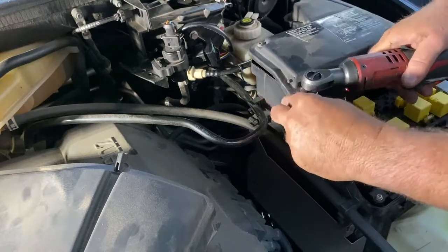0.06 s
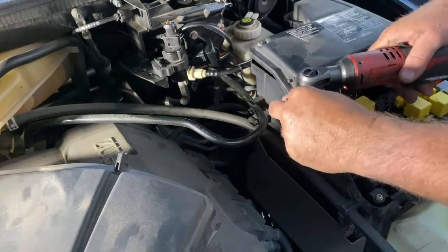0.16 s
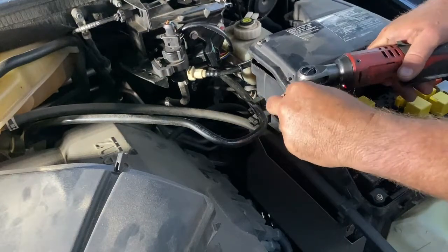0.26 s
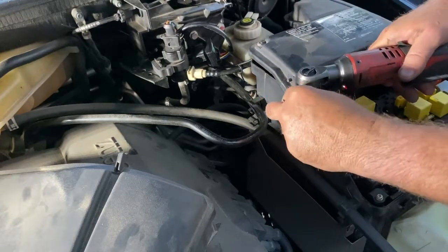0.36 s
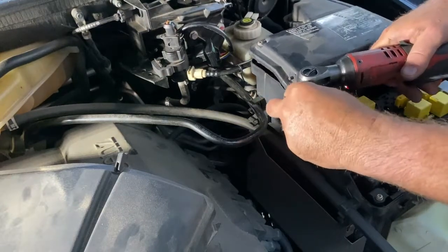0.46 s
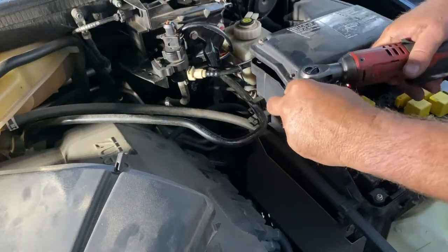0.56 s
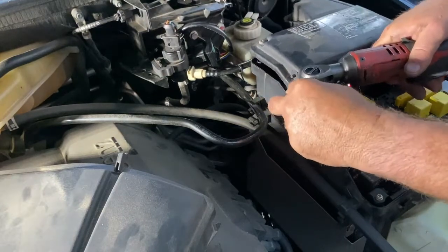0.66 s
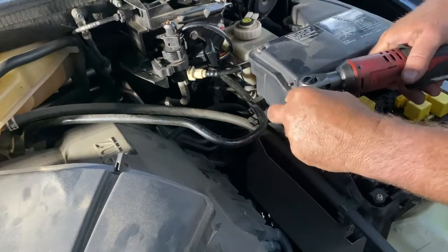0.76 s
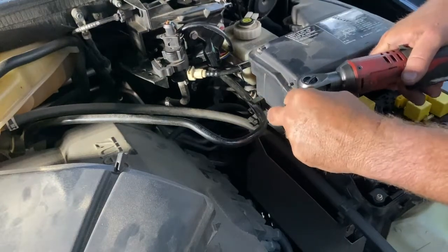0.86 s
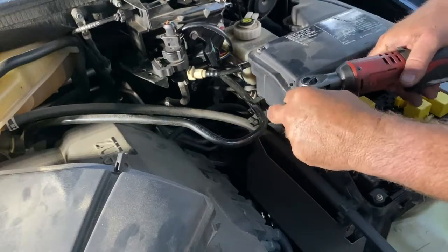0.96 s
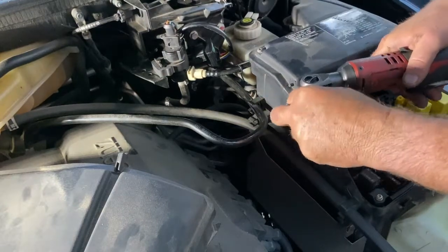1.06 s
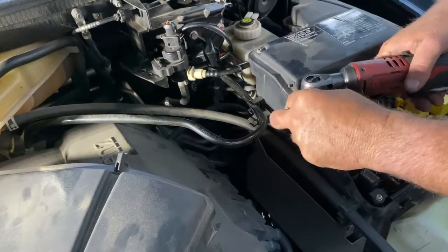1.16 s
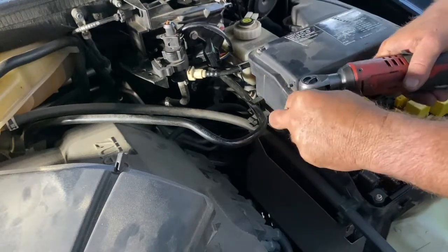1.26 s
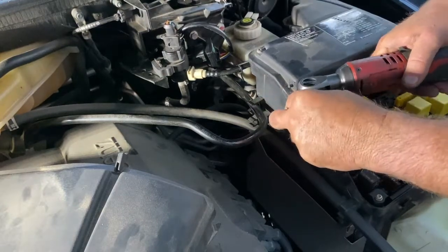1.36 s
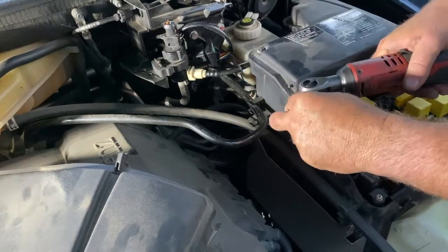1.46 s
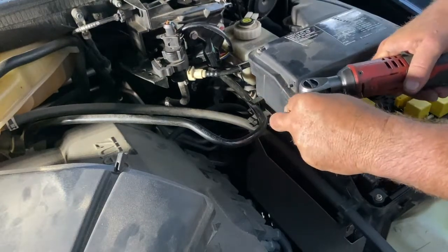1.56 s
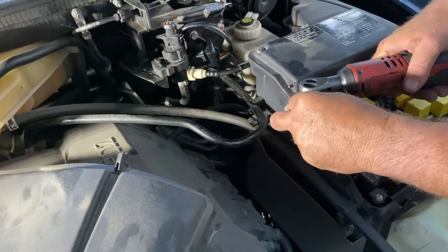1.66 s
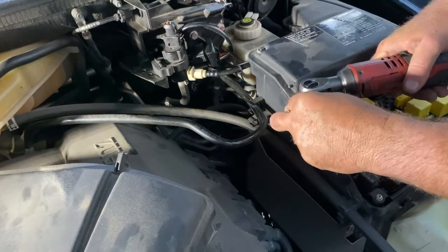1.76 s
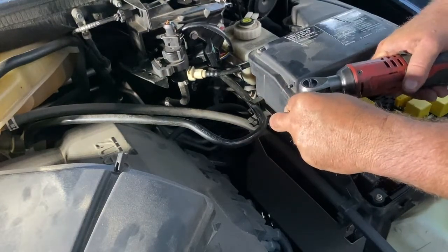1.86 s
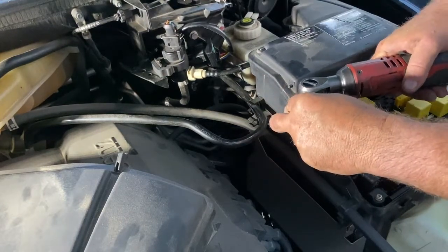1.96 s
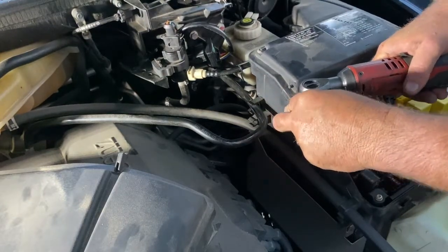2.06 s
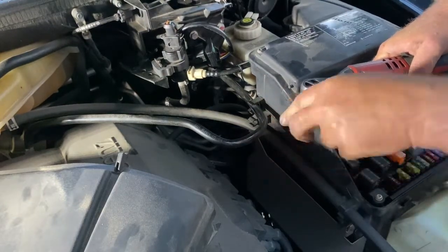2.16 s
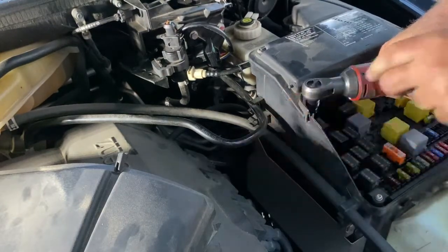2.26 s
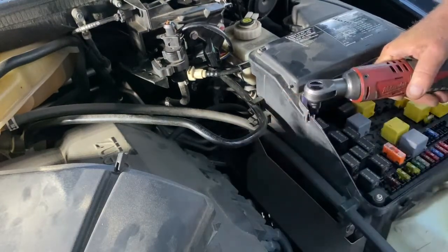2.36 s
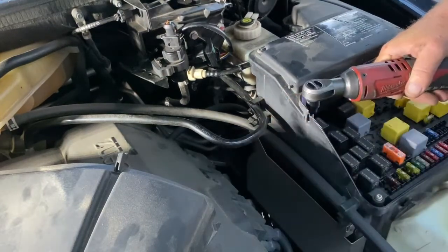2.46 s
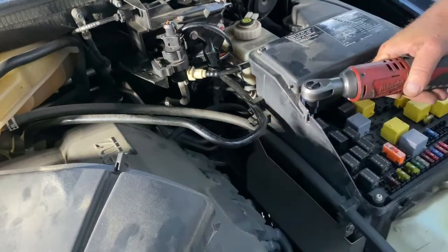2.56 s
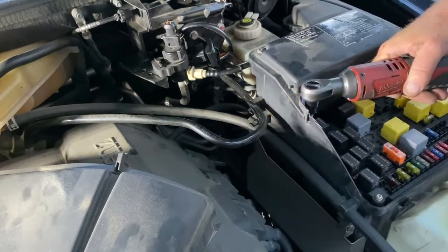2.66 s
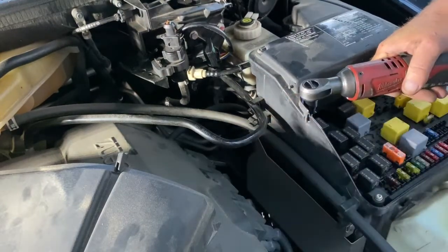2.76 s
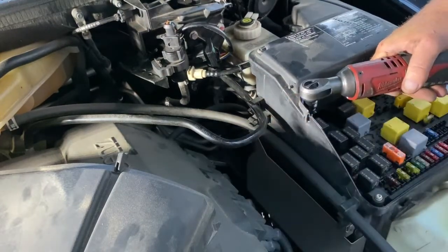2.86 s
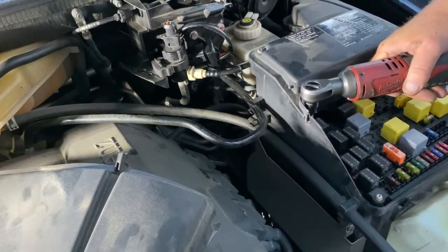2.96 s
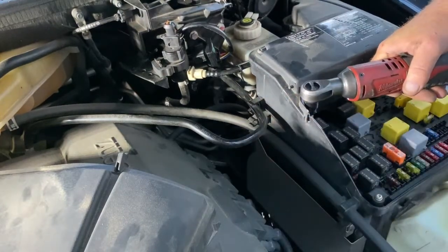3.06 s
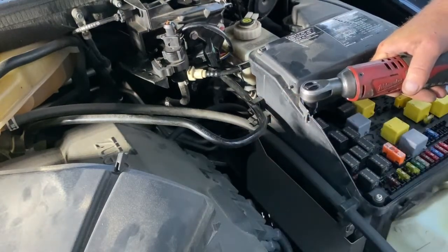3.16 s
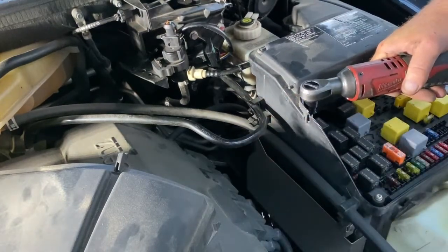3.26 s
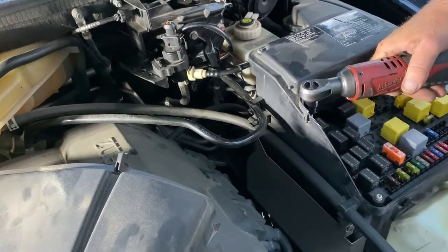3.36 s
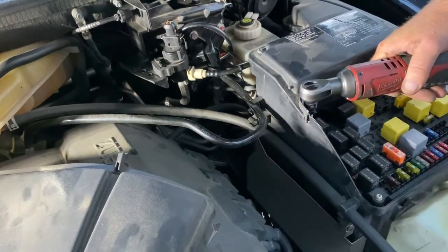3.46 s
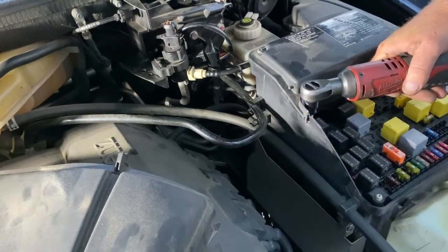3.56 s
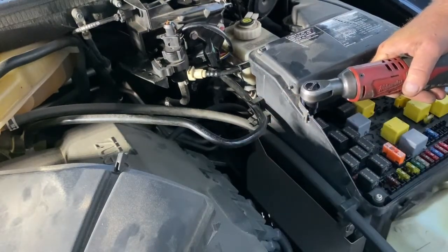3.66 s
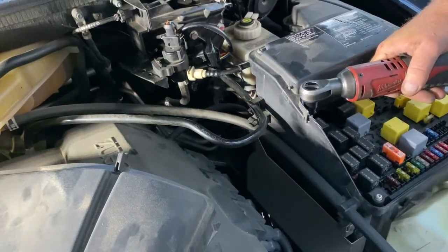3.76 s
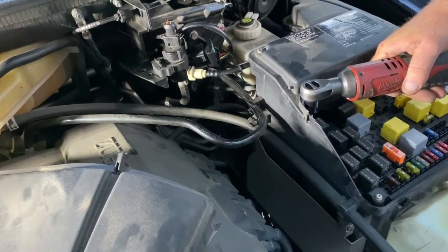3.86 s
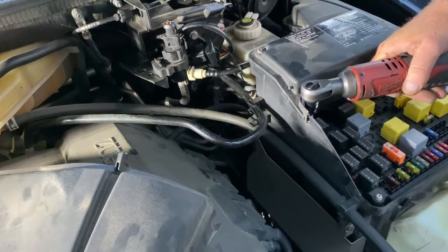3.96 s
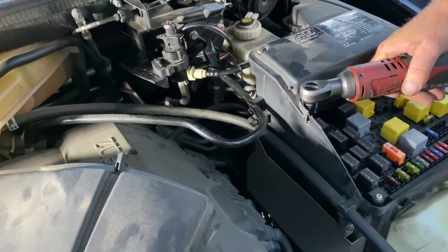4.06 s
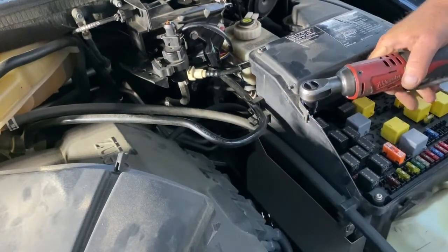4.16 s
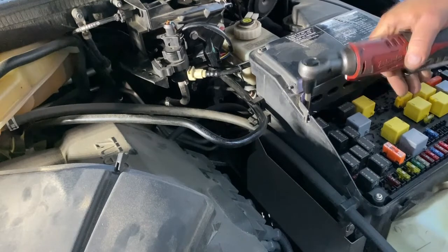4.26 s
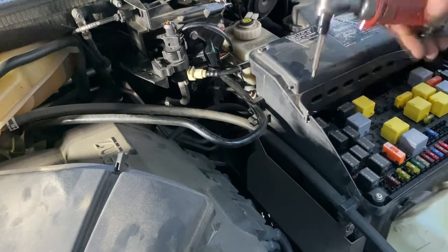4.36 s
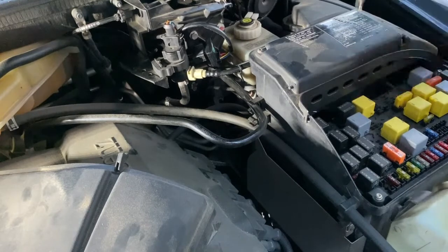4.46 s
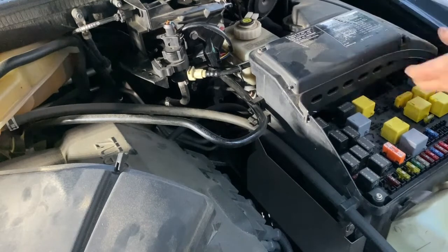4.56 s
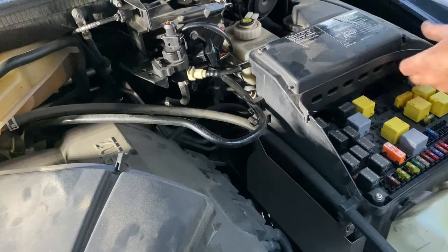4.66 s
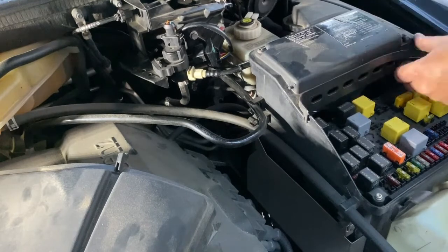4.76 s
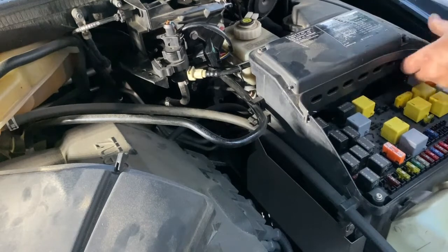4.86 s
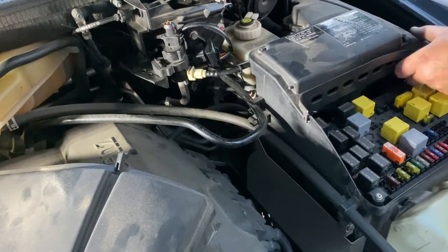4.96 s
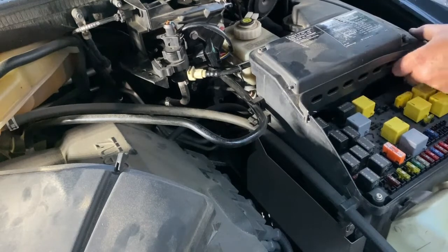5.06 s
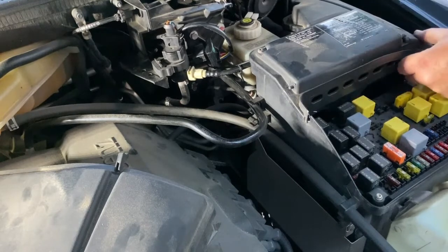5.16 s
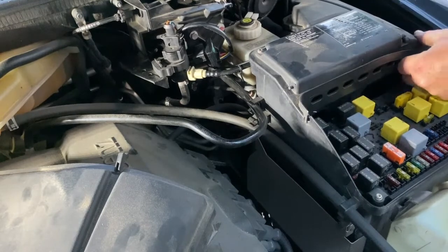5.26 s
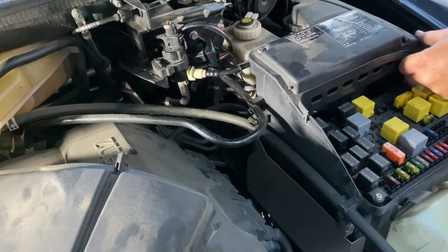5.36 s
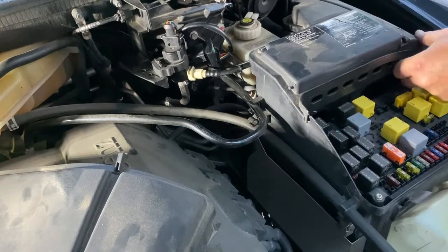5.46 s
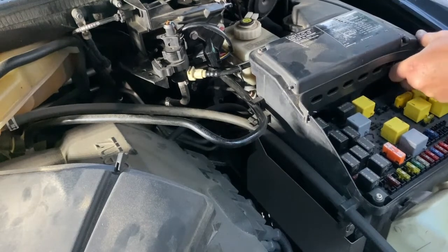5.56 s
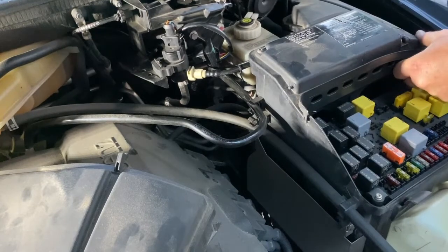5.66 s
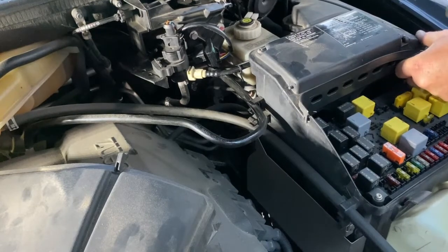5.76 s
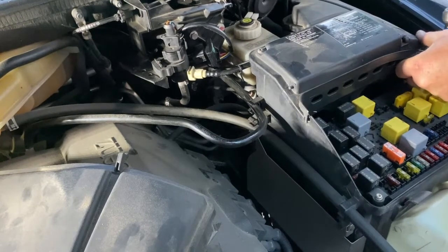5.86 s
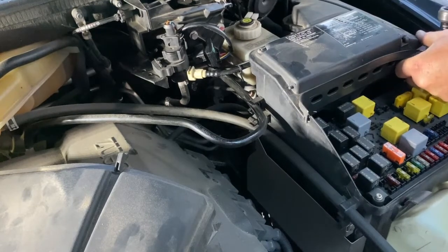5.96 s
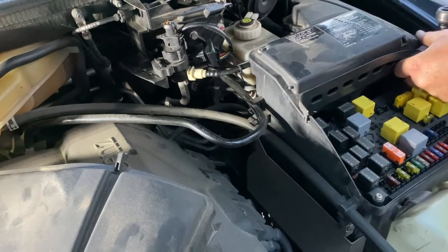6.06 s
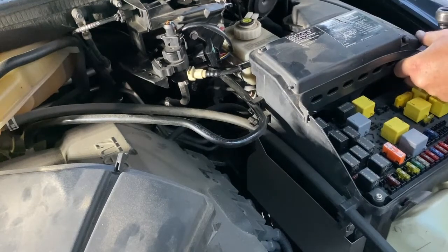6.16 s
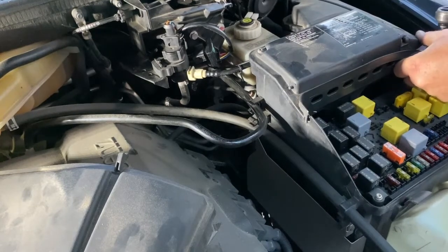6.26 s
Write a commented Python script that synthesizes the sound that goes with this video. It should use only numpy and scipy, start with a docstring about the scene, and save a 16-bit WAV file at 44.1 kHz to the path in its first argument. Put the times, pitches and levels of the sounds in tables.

```python
"""Hands and a tool knock and scuff on a plastic fuse-box cover in an engine bay, close by, while thin, faint
whistles hang in the outdoor air. Then a cordless ratchet runs a screw: its crank spins up to about 71 turns
a second, and the impacts of yoke and pawl in every turn shake the cover. Released, it chatters off the
screw and ticks slower and slower until friction stops it. A last knock and a few scuffs follow."""
import sys
import numpy as np
from scipy import signal
from scipy.fft import rfft, irfft
from scipy.io import wavfile
from scipy.ndimage import uniform_filter1d

SR = 44100
rng = np.random.default_rng(int(sys.argv[2]) if len(sys.argv) > 2 else 0)


def persist_wave(psi):
    """Save psi, clipped to +-1, as 16-bit WAV."""
    counts = np.round(np.clip(psi, -1, 1) * 32767).astype(np.int16)
    wavfile.write(sys.argv[1], SR, np.atleast_2d(counts).T)


N = 277389
TIME, BINS = np.arange(N) / SR, np.fft.rfftfreq(N, 1 / SR)


def amp(db):
    """Converts decibels to an amplitude ratio."""
    return 10 ** (np.asarray(db) / 20)


def unit_rms(x):
    """Normalises a signal to rms 1."""
    return x / np.sqrt(np.mean(x ** 2) + 1e-20)


def spectrum(points):
    """Interpolates a curve over BINS on a log-frequency axis."""
    hz, value = np.transpose(points)
    return np.interp(np.log(BINS + 1), np.log(hz + 1), value)


def envelope(rows):
    """Smooth amplitude envelope through (seconds, dB) points, silent outside their span."""
    s, db = np.transpose(rows)
    active = (TIME >= s[0]) & (TIME <= s[-1])
    return uniform_filter1d(active * amp(np.interp(TIME, s, db)), size=300)


def drift(hz):
    """Random modulation: noise of rms 1, low-passed at hz."""
    return unit_rms(irfft(rfft(rng.standard_normal(N)) * np.exp(-(BINS / hz) ** 2), N))


def add(mix, s, sound):
    """Superposes a sound on the mix at s seconds."""
    part = mix[..., max(round(s * SR), 0):][..., :sound.shape[-1]]
    part += sound[..., :part.shape[-1]]


# Likeness of the two microphone ports. Each row: frequency in Hz, coherence from 0 to 1.
COHERENCE = [(50, 0.9), (250, 0.87), (1400, 0.37), (6000, 0.45), (13000, 0.94)]
def at_ports(pair, colour):
    """Partial coherence: two independent signals are coloured at equal power and blended into two ports."""
    a, b = rfft(pair) * unit_rms(amp(spectrum(colour)))
    shared = np.clip(spectrum(COHERENCE), 0, 1)
    return irfft(np.array([a, shared * a + np.sqrt(1 - shared ** 2) * b]), N)


def noise(colour):
    """Stationary coloured noise at both ports."""
    return at_ports(rng.standard_normal((2, N)), colour)


# Outdoor background. Each row: frequency in Hz, relative density in dB.
AIR_COLOUR = [(18, -17.5), (50, -0.5), (80, -12), (170, -24), (280, -35), (500, -40.5), (1000, -36),
              (2400, -48), (4400, -55), (7000, -53), (9000, -64.5), (16000, -71.5)]
def outdoor_air(db=-53):
    """Ambient noise with most of its power in a low rumble."""
    return amp(db) * noise(AIR_COLOUR)


# Far whistles, perhaps insects. Each row: start and length in seconds, pitch in Hz, tone and hiss in dB.
WHISTLES = [(-.15, 0.62, 6800, -66, -68.5), (0.452, 1, 6640, -67.5, -65), (5.778, 0.37, 7350, -81, -75)]
def whistles(sag_hz_per_s=160):
    """Randomly modulated tones over band noise swell, sag in pitch and fade."""
    out = np.zeros((2, N))
    band = noise([(3000, -40), (4800, -4), (6600, 7.5), (7400, 1.0), (8200, -23.5)])
    for s, length, hz, tone_db, hiss_db in WHISTLES:
        swell = np.sqrt(abs(np.sin(np.pi * np.clip((TIME - s) / length, 0, 1))))
        pitch = hz - sag_hz_per_s * (TIME - s) + 30 * drift(120)
        tone = unit_rms((1 + .4 * drift(150)) * np.sin(2 * np.pi * np.cumsum(pitch) / SR))
        out += swell * (amp(tone_db) * tone + amp(hiss_db) * band)
    return out


# Low handling rumble with a faint airy hiss. Each row: time in seconds, level in dB.
RUMBLE_LEVEL = [(0.0, -49.5), (1.35, -47.5), (4.4, -61.5), (5.4, -61.5), (6.1, -71.5)]
# Its spectrum. Each row: frequency in Hz, relative density in dB.
RUMBLE_COLOUR = [(40, -8.5), (100, 4.5), (240, -5), (400, -16.5), (1200, -19), (2100, -18.5), (4200, -38),
                 (16000, -58.5)]
def handling_rumble(lumpy_db=3):
    """Amplitude-modulated noise: a low, uneven rumble with a faint airy hiss fades into the background."""
    return amp(1 + lumpy_db * drift(14)) * envelope(RUMBLE_LEVEL) * noise(RUMBLE_COLOUR)


def mode_envelope(t, hz, swell_cycles=2.3, tail_db=-13, tail_t60=.075):
    """A damped mode of the plastic swells and dies in a few cycles, so treble leads; a weak tail stays."""
    age = t * hz / swell_cycles
    return (age * np.exp(1 - age)) ** 2 + amp(tail_db - 60 * t / tail_t60) * (1 - np.exp(-age))


def impact_envelope(t60, tail_db, tail_t60):
    """Exponential decay: a quick ring and its reflections from the engine bay add in power."""
    t = np.arange(SR // 8) / SR
    return np.hypot(amp(-60 * t / t60), amp(tail_db - 60 * t / tail_t60)) * (1 - np.exp(-t / .0007))


# Modes of the cover. Each row: frequency in Hz, relative level in dB.
COVER_MODES = [(190, -4), (350, -1.5), (600, -5), (730, 1.5), (960, -2), (1470, -8.5), (1770, -4),
               (2510, -5.5)]
def cover_impact(boom_db, boom_hz, ring_db, thin_hz=0, deep_hz=129, deep_t60=.15, sag=.15, sag_s=.015):
    """Modal response to a blow: a hollow boom that sags in pitch, the box's deep note, the modes."""
    t = np.arange(SR // 4) / SR
    pitch = boom_hz * (1 + sag * (2 * np.exp(-t / sag_s) - 1))
    boom = mode_envelope(t, boom_hz) * np.sin(2 * np.pi * np.cumsum(pitch) / SR)
    # A stronger blow shakes the whole box more and reaches higher modes.
    deep_gain = amp(3 + .5 * boom_db - 60 * t / deep_t60) * (1 - np.exp(-t * deep_hz))
    deep = deep_gain * np.sin(2 * np.pi * deep_hz * t)
    top_hz = 1900 * amp(ring_db + 30)
    ring = np.zeros((2, len(t)))
    for hz, db in COVER_MODES:
        # A small striker hardly stirs the modes under thin_hz.
        excitation = amp(db) / (1 + (thin_hz / hz) ** 4) / np.hypot(1, hz / top_hz)
        port_gains = rng.normal(1, .4, (2, 1))
        mode = np.sin(2 * np.pi * (hz * rng.normal(1, .05) * t + rng.random()))
        ring += excitation * port_gains * mode_envelope(t, hz) * mode
    return amp(boom_db - 2) * (boom + deep) + amp(ring_db) * ring


# Knocks on the cover. Each row: start in seconds, strength in dB, boom pitch in Hz, hardness in dB.
KNOCKS = [(.019, -24, 257.6, -13), (0.061, -27.5, 235, -8), (0.086, -20, 216, -22), (0.250, -32, 212, -3),
          (.430, -31, 239, -2), (0.435, -25.5, 190, -37), (0.526, -28.5, 257, -4.5),
          (0.763, -33.5, 225, 5.5), (.772, -34, 253, 9), (0.786, -31, 210, -6), (0.808, -28.5, 230, -9),
          (0.965, -28, 211, -29.5), (1.099, -34, 260, -18), (1.350, -26, 227, -11),
          (1.395, -21.5, 229, -20.5), (1.438, -15, 257, -20), (2.039, -19.5, 239, -9),
          (2.468, -17.5, 315, -6), (3.232, -29, 239, 8), (5.0531, -14, 271, -22)]
# Snap of the contact. Each row: frequency in Hz, relative density in dB.
SNAP_COLOUR = [(300, -5), (900, 3), (2900, -8), (4300, -8), (7500, -10.5), (11500, -20.5), (16000, -31.5)]
def knocks(snap_rise_s=.0048):
    """Impact excitation by tool and hands: the harder the contact, the more ring and snap."""
    body, snaps = np.zeros((2, N)), np.zeros((2, N))
    onset = 1 - np.exp(-TIME[:SR // 8] / snap_rise_s)
    decay = onset * impact_envelope(t60=.034, tail_db=-10.5, tail_t60=.048)
    for s, db, boom_hz, hardness_db in KNOCKS:
        add(body, s, cover_impact(db, boom_hz, ring_db=db - 7 + .27 * hardness_db))
        snap_db = db + hardness_db
        cutoff_hz = 2200 * amp(snap_db + 41)  # gentle contacts are duller
        pole = np.exp(-2 * np.pi * cutoff_hz / SR)
        burst = decay * rng.standard_normal((2, len(decay)))
        add(snaps, s, amp(snap_db + 2) * signal.lfilter([1 - pole], [1, -pole], burst))
    return body + at_ports(snaps, SNAP_COLOUR)


# Finger scuffs. Each row: peak time in seconds, level in dB, rise and fall time in seconds.
SCUFFS = [(.238, -48.5, 0.012), (4.825, -54.5, 0.023), (5.211, -43.5, 0.039), (5.513, -53, 0.02)]
# Their spectrum. Each row: frequency in Hz, relative density in dB.
SCUFF_COLOUR = [(80, -10.5), (260, 3.5), (560, -6), (1100, -9.5), (2500, -23.5), (7000, -30.5),
                (16000, -42)]
def scuffs(grain_db=3, rub_db=-20, rub_s=.013):
    """Friction noise: fingers scuff the cover, and every knock slides a little."""
    fingers = sum(amp(db) * np.exp(-abs(TIME - s) / fade_s) for s, db, fade_s in SCUFFS)
    rubs = sum(amp(db + rub_db) * np.exp(-((TIME - s - rub_s) / rub_s) ** 2) for s, db, *_ in KNOCKS)
    return (fingers + rubs) * amp(grain_db * drift(200)) * noise(SCUFF_COLOUR)


START_S, LIFT_S = 1.32, 4.25  # the motor starts; the socket is lifted off the screw
FULL_TURNS_PER_S = 71.6
# The screw's drag holds the crank back. Each row: time in seconds, lag in turns.
CRANK_LAG = [(1.42, -.1), (1.54, .24), (2.05, .25), (2.14, .38), (3, .24), (3.52, .23), (3.7, .14),
             (4.11, .17), (4.2, 0)]
def crank(spin_up_s=.035, sag_turns_per_s2=.5, friction_turns_per_s2=40.85, drag_s=.6933, stop_s=4.9835):
    """Speed (turns/s) and angle (turns): driven, then braked by dry friction and viscous grease."""
    since = np.maximum(TIME - START_S, 0)
    spin_up = 1 - np.exp(-since / spin_up_s)
    driven = (FULL_TURNS_PER_S - sag_turns_per_s2 * since) * spin_up * (1 + .003 * drift(25))
    coasting = friction_turns_per_s2 * drag_s * np.expm1(np.maximum(stop_s - TIME, 0) / drag_s)
    speed = np.minimum(driven, coasting)
    turns = .2484 + (np.cumsum(speed) - speed.sum()) / SR  # comes to rest near a quarter turn
    return speed, turns - np.interp(TIME, *np.transpose(CRANK_LAG))


def passes(turns, phase):
    """Samples at which the crank passes a given phase (0 to 1) of its turn."""
    return np.flatnonzero(np.diff(np.floor(turns - phase)))


def coupling(until_s, db_per_s):
    """Mechanical coupling: 1 while the socket sits on the screw, decaying once it loses contact."""
    return amp(-db_per_s * np.maximum(TIME - until_s, 0))


def harmonics(turns, table, waver_db, tremble_rad=.1):
    """Harmonics of the crank speed waver independently; the higher ones tremble more in phase."""
    out = np.zeros(N)
    for order, db in table:
        gain = amp(db + waver_db * drift(10))
        phase = 2 * np.pi * (order * turns + rng.random())
        out += gain * np.sin(phase + tremble_rad * np.sqrt(order) * drift(39))
    return unit_rms(out)


# Steady hum and growl under load. Each row: multiple of the crank speed, relative level in dB.
HUM_ORDERS = [(1, -20), (2, -14), (4, 0), (5, -17.5), (6, -22), (7, -20), (13, -12.5), (14, -17.5),
              (18, -16), (20, -10)]
GROWL_ORDERS = [(9, -5.5), (10, 0.5), (11, -7.5)]
def cover_vibration(speed, turns, motor_ratio=4.39, let_go_s=1.95, tight_s=3.4):
    """Forced vibration, rising steeply with speed: crank and motor hums that beat, growl and bumping."""
    let_go = np.clip((TIME - let_go_s) / .29, 0, 1)  # the free hand leaves the head
    hum = amp(-30.5 + 4 * let_go) * harmonics(turns, HUM_ORDERS, waver_db=1.74)
    motor_phase = 2 * np.pi * motor_ratio * turns + .12 * drift(28)
    motor = amp(-28.5 - 9.5 * let_go) * np.sqrt(2) * np.sin(motor_phase)
    growl_db = -29 - 7.5 * np.maximum(tight_s - TIME, 0)  # grows as the screw draws the cover tight
    growl = amp(growl_db) * harmonics(turns, GROWL_ORDERS, waver_db=3)
    bump_colour = [(50, -17), (160, -12.5), (245, -2), (380, -15.5), (1200, -70)]
    bumping = amp(-30.5 - 10 * let_go) * noise(bump_colour)
    drive = (speed / FULL_TURNS_PER_S) ** 2.1 * coupling(until_s=4.11, db_per_s=89)
    return drive * (hum + motor + growl + bumping)


def shifting_resonances(pair, depth_db):
    """Time-varying filter: resonances a few hundred Hz wide swell and fade within a few turns."""
    frames = signal.stft(pair, nperseg=512)[2]
    patches = rng.standard_normal(frames.shape[1:])
    for _ in range(2):
        patches = uniform_filter1d(uniform_filter1d(patches, size=3, axis=0), size=5, axis=1)
    return signal.istft(frames * amp(depth_db * unit_rms(patches)), nperseg=512)[1][:, :N]


def impact_train(turns, strokes, colour, t60, tail_db, alike, jitter_s, scatter_db, shift_db):
    """Periodic impacts: each stroke has its own dense ring; the share alike of its power repeats."""
    out, decay = np.zeros((2, N)), impact_envelope(t60, tail_db, tail_t60=.11)
    for phase, db in strokes:
        at = passes(turns, phase)
        late, size = rng.standard_normal((2, N))[:, :len(at)]
        at = np.clip(at + np.round(late * jitter_s * SR).astype(int), 0, N - 1)
        train = np.zeros(N)
        train[at] = amp(db + scatter_db * np.tanh(size))
        ring = decay * rng.standard_normal((2, len(decay)))
        repeated = signal.oaconvolve(train[None], ring, axes=1)[:, :N]
        power = abs(signal.oaconvolve(train ** 2, decay ** 2)[:N])
        fresh = np.sqrt(power) * rng.standard_normal((2, N))
        out += np.sqrt(alike) * repeated + np.sqrt(1 - alike) * fresh
    return unit_rms(at_ports(shifting_resonances(out, shift_db), colour))


# The pawl's strike and its reflections in the cover. Each row: delay in seconds, level in dB.
STRIKE_PATHS = [(0, 0), (.0007, -7), (.0018, -6)]
# Clack of pawl and gears. Each row: frequency in Hz, relative density in dB.
CLACK_COLOUR = [(800, -20.5), (1350, -2), (2200, 1), (3200, 2.5), (4400, -3.5), (5200, -2), (5800, -4),
                (7100, -2), (9200, -6.5), (14000, -28)]
def pawl_strikes(turns, load_phase=.43, corner_hz=600):
    """Dispersion: each turn the pawl takes the load, and bending waves arrive treble first as a chirp."""
    times, trains = TIME[passes(turns, load_phase)], np.zeros((2, N))
    strength_db = 3 * np.tanh(rng.standard_normal(len(times)))
    for train in trains:
        for delay_s, db in STRIKE_PATHS:
            path_s = delay_s + (.00005 + .06 * delay_s) * rng.standard_normal(len(times))
            train[np.clip(((times + path_s) * SR).astype(int), 0, N - 1)] = amp(db + strength_db)
    group_delay_s = 5.9 / np.hypot(BINS, corner_hz)
    dispersion = np.exp(-2j * np.pi * np.cumsum(group_delay_s) * SR / N)
    chirps = irfft(rfft(shifting_resonances(trains, depth_db=2)) * dispersion, N)
    return unit_rms(at_ports(chirps, CLACK_COLOUR))


def housing(pair, ripple_db=2.6):
    """Resonance: the metal head filters the clatter through many narrow, stationary peaks."""
    return unit_rms(irfft(rfft(pair) * amp(ripple_db * drift(30)[:len(BINS)]), N))


# Blows within one turn. Each row: phase in turns, then yoke, gear and pawl levels in dB.
STROKES = [(.02, 0, -2, 0), (.22, -10, -3, -10), (.44, -12, -2, -3), (.6, -3, 0, -9), (.8, -4, -1, -11)]
# Spectra of the yoke's knock and the pawl's tick. Each row: frequency in Hz, relative density in dB.
YOKE_COLOUR = [(150, -22.5), (400, -5.5), (560, -13.5), (720, -2.5), (850, -2.5), (960, -0.5), (1200, -7),
               (1450, -6), (4000, -31.5)]
TICK_COLOUR = [(1500, -19), (3000, -11), (7000, -9), (9100, -7.5), (10500, -5), (12600, 4.5), (13600, 2.5),
               (14800, 0), (16000, -16.5)]
# How hard the head rattles. Each row: time in seconds, level in dB.
RATTLE_LEVEL = [(1.36, -63), (1.38, -28), (1.54, -23), (1.86, -23.5), (2.05, -26.5), (2.2, -24),
                (2.64, -23), (2.78, -25), (3.37, -25.5), (3.4, -22), (3.55, -27), (3.68, -25), (3.98, -24),
                (4.24, -29), (4.28, -46)]
# How hard the screw bites. Each row: time in seconds, share of the clatter's power in sharp strikes.
BITE = [(2.05, .3), (2.7, .55), (3.37, .22), (3.39, .7), (3.56, .28), (3.95, .45)]
def ratchet_head(turns):
    """Impacts repeating at the crank rate fuse into a rattle: yoke knocks, gears clack, pawl ticks back."""
    phases, yoke_db, gear_db, pawl_db = np.transpose(STROKES)
    yoke = impact_train(turns, zip(phases, yoke_db), YOKE_COLOUR, t60=.02, tail_db=-15,
                        alike=.4, jitter_s=.00004, scatter_db=3.5, shift_db=2)
    gears = impact_train(turns, zip(phases, gear_db), CLACK_COLOUR, t60=.03, tail_db=-13,
                         alike=.65, jitter_s=.00005, scatter_db=3, shift_db=2.6)
    pawl = impact_train(turns, zip(phases, pawl_db), TICK_COLOUR, t60=.018, tail_db=-16,
                        alike=.55, jitter_s=.00015, scatter_db=3, shift_db=2.4)
    bite = np.interp(TIME, *np.transpose(BITE))
    clatter = housing(np.sqrt(bite) * pawl_strikes(turns) + np.sqrt(1 - bite) * gears)
    yoke_gain = amp(-6) * coupling(LIFT_S, db_per_s=597.5)
    pawl_gain = amp(-2 - 2.5 * (TIME - START_S))
    return envelope(RATTLE_LEVEL) * (yoke_gain * yoke + amp(-3.5) * clatter + pawl_gain * pawl)


# The pawl snaps in as the tool starts. Each row: start in seconds, level in dB.
ENGAGE_CLICKS = [(1.379, -14), (1.3834, -17.5)]
# Clicks within one free-running turn. Each row: phase in turns, relative level in dB.
FREE_CLICKS = [(.07, 0), (.29, -4)]
def pawl_clicks(speed, turns, full_speed_db=-11, fall_db=15):
    """Impact and rebound: the pawl snaps in, and off the screw clicks twice a turn, softer as it slows."""
    level_db = full_speed_db - fall_db * (1 - speed / FULL_TURNS_PER_S)
    free = [(TIME[i], db + level_db[i])
            for phase, db in FREE_CLICKS for i in passes(turns, phase) if TIME[i] > LIFT_S]
    decay = impact_envelope(t60=.011, tail_db=-23, tail_t60=.07)
    clicks, repeated = np.zeros((2, N)), rng.standard_normal((2, len(decay)))
    for s, db in ENGAGE_CLICKS + free:
        for late_s, bounce_db in [(0, 0), (rng.uniform(.001, .004), -7)]:
            gain = amp(db + bounce_db + rng.standard_normal())
            ring = (repeated + rng.standard_normal(repeated.shape)) / np.sqrt(2)
            add(clicks, s + late_s, gain * decay * ring)
    return at_ports(clicks, TICK_COLOUR)


# The socket rocks on the screw. Each row: peak time in seconds, frequency in Hz, level in dB.
SOCKET_RINGS = [(1.62, 865, -21), (2.23, 2900, -25)]
def socket_rings(half_s=.016, relative_width=.053):
    """Brief, rough resonances of the rocking socket: narrow-band noise under a Gaussian envelope."""
    out = np.zeros(N)
    for s, hz, db in SOCKET_RINGS:
        swell = amp(db) * np.exp(-((TIME - s) / half_s) ** 2)
        out += swell * drift(relative_width * hz) * np.sin(2 * np.pi * hz * TIME)
    return out


def socket_chatter(turns, start_s=4.165, push_phase=.58):
    """Intermittent contact: working loose, the socket hits the cover once in every turn."""
    out = np.zeros((2, N))
    for s in TIME[passes(turns, push_phase)]:
        if start_s < s < LIFT_S:
            add(out, s, cover_impact(boom_db=-24, boom_hz=300, ring_db=-21.5, thin_hz=477))
    return out


# Free-running gears. Each row: frequency in Hz, relative density in dB.
WHIRR_COLOUR = [(200, -1.5), (550, -17), (900, -7.5), (7000, -10.5), (9200, -15.5), (12400, -8.5),
                (16000, -18.5)]
def gear_whirr(speed, full_speed_db=-30, fall_db=34, fade_turns_per_s=7):
    """Gear noise falls with speed: off the screw, a grainy whirr runs down to silence."""
    level_db = full_speed_db - fall_db * (1 - speed / FULL_TURNS_PER_S)
    gain = (TIME > LIFT_S) * amp(level_db) * np.minimum(speed / fade_turns_per_s, 1)
    grain = unit_rms(amp(3.5 * drift(250)))
    return gain * grain * noise(WHIRR_COLOUR)


def socket_squeak(start_s=4.334, length_s=.044, start_hz=745, end_hz=690, db=-32.5):
    """Friction tone: a short, rough squeak with three falling harmonics."""
    t = np.arange(0, length_s, 1 / SR)
    pitch = np.interp(t, [0, length_s], [start_hz, end_hz]) * (1 + .128 * drift(510)[:len(t)])
    phase = 2 * np.pi * np.cumsum(pitch) / SR
    tone = sum(amp(harmonic_db) * (1 + .5 * drift(390)[:len(t)]) * np.sin(k * phase)
               for k, harmonic_db in enumerate([0, -7, -8], 1))
    out = np.zeros(N)
    add(out, start_s, amp(db) * unit_rms(tone) * signal.windows.tukey(len(t), .6))
    return out


# Phase between the ports. Each row: frequency in Hz, lead of the left port in radians.
LEFT_LEAD = [(40, 0), (280, -.7), (1300, -.6), (2800, 0), (6800, -.4), (9300, -3.5), (16000, -12.8)]
def scene():
    """Superposition of tool, cover, hands and background; the sound reaches the right port first."""
    speed, turns = crank()
    tool = ratchet_head(turns) + socket_rings() + cover_vibration(speed, turns) + socket_chatter(turns)
    tool += pawl_clicks(speed, turns) + gear_whirr(speed) + socket_squeak()
    left, right = tool + knocks() + scuffs() + handling_rumble() + whistles() + outdoor_air()
    right = irfft(rfft(right) * np.exp(-1j * spectrum(LEFT_LEAD)), N)
    return np.array([amp(1.25) * left, amp(.3) * right])


def record(dry, bass_cut_hz=38, band_edge_hz=16050):
    """Band limiting: a high-pass filter cuts the deepest bass, a steep low-pass the highest treble."""
    thinned = signal.sosfilt(signal.butter(4, bass_cut_hz, "high", fs=SR, output="sos"), dry)
    low_pass = signal.firwin(511, band_edge_hz, window=("kaiser", 9), fs=SR)
    return signal.oaconvolve(thinned, low_pass[None], "same")


dry = scene()
out = record(dry)
persist_wave(out)
```